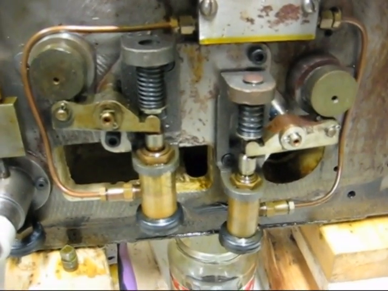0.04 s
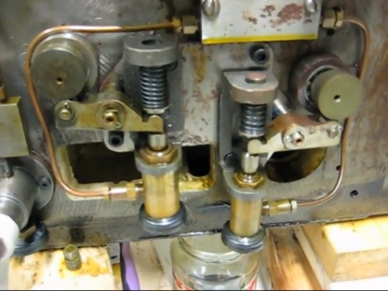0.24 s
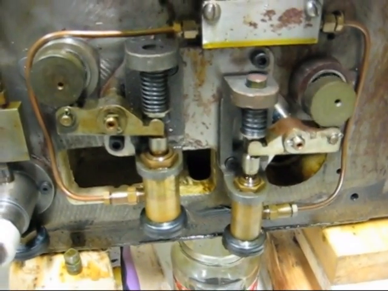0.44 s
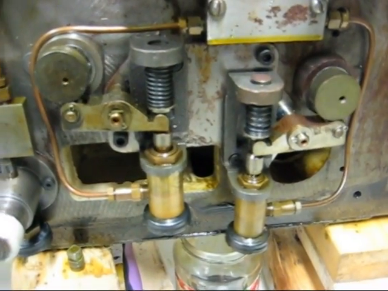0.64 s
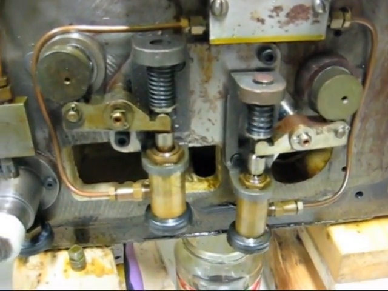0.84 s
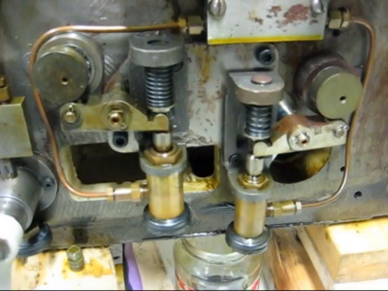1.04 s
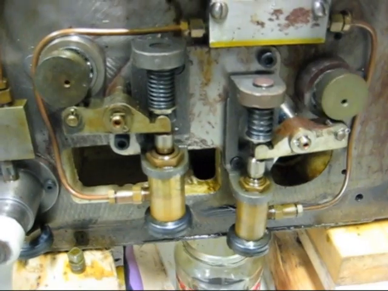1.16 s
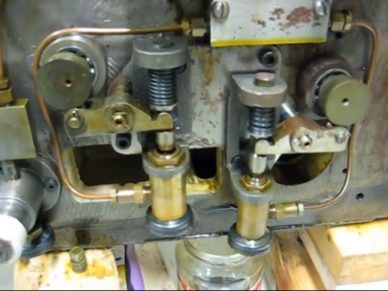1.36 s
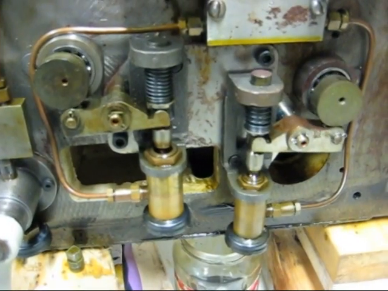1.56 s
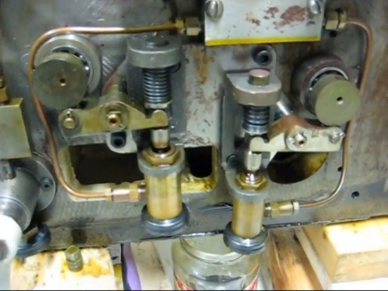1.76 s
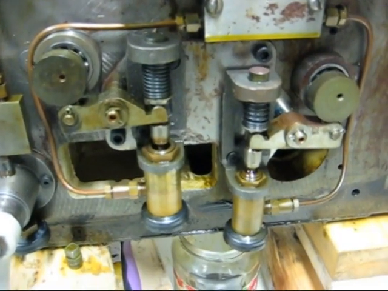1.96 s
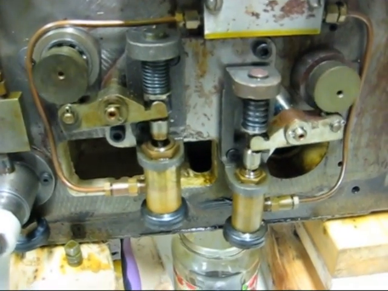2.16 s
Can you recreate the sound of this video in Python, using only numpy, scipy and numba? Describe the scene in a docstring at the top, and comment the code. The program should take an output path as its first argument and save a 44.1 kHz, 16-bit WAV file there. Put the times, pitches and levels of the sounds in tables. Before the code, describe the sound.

Metal pump levers clicking and knocking unevenly, with short rasps of rubbing steel.

```python
"""The cams of a lathe's oil pump, turned by hand in a small workshop, close to a camera's microphone.
Rollers rub on the cams, levers knock against the plungers and springs snap with bright ticks.
The casting and the room ring on, and a long spring sings after two late knocks. Behind it lie still air
and a distant hum. The camera whines, hisses and limits the loudest knocks; only its left channel is live."""
import sys
import numpy as np
from scipy import signal
from scipy.fft import rfft, irfft
from scipy.io import wavfile
from scipy.ndimage import uniform_filter1d
from numba import njit

SR = 44100
rng = np.random.default_rng(int(sys.argv[2]) if len(sys.argv) > 2 else 0)


def transcribe(u):
    """Save the signal u as a 16-bit wav file named by the first command-line argument.

    u: samples, shape (n,) or (channels, n), limited to [-1, 1]; the rate is SR.
    q: integer samples, one column per channel.
    """
    v = np.clip(np.atleast_2d(u).T, -1, 1)
    q = np.round(v * 32767).astype(np.int16)
    wavfile.write(sys.argv[1], SR, q)


N = 97020  # 2.2 s


def undb(db):
    """Decibels to amplitude."""
    return 10 ** (np.asarray(db) / 20)


def level(x, db):
    """Scale to an RMS level in dB."""
    return x * undb(db) / np.sqrt(np.mean(x ** 2))


def unit_energy(x):
    """Scale to an energy of 1."""
    return x / np.sqrt(np.sum(x ** 2))


def fade(t, t60_s):
    """Exponential decay that is 60 dB down at t60_s."""
    return np.exp(-np.log(1000) * t / t60_s)


def tint(x, points):
    """Filter by a curve through (frequency_hz, gain_db) points."""
    hz, db = np.array(points).T
    bins_hz = np.maximum(np.fft.rfftfreq(len(x), 1 / SR), 1)
    return irfft(rfft(x) * undb(np.interp(np.log(bins_hz), np.log(hz), db)), len(x))


def resonate(x, hz, width_hz):
    """Two-pole resonance with gain 1 at its centre."""
    return signal.lfilter(*signal.iirpeak(hz, hz / width_hz, fs=SR), x)


def camera_whine():
    """A thin buzz at the microphone: tones whose phase slips and snaps back with each frame."""
    # whine tones: pitch_hz, slip_hz, relative_db
    tones = [(7560, 10.5, 0), (7852.2, 15, -5.5), (11041, 0, -17)]
    frame_hz, snap_s = 30, .0015
    t = np.arange(N) / SR
    in_frame_s = uniform_filter1d((t + rng.random()) % (1 / frame_hz), int(snap_s * SR))
    whine = sum(undb(db) * np.sin(2 * np.pi * (hz * t + slip_hz * in_frame_s))
                for hz, slip_hz, db in tones)
    return level(whine, db=-39.5)


def air_and_hiss():
    """Still workshop air and steady microphone hiss."""
    # noise floor colour: frequency_hz, gain_db
    colour = [(25, -0.5), (100, 1.5), (220, 1.5), (450, -4), (950, 6.5), (1250, 3.5), (2100, -77.5),
              (2600, -13.5), (4700, -7.5), (5700, 9.5), (7000, -16), (8400, 1.5), (9300, 9.5), (10800, 7.5),
              (12000, -13.5)]
    return level(tint(rng.standard_normal(N), colour), db=-43)


def distant_hum():
    """Faint, unsteady low tones from far off in the workshop."""
    # hum tones: pitch_hz, level_db
    tones = [(199, -66), (385, -62)]
    return sum(level(resonate(rng.standard_normal(N), hz, width_hz=12.6), db) for hz, db in tones)


def rollers():
    """Oily steel rubs on the cams: a smooth rush with tiny catches, following the speed of the hand."""
    # course of the rubbing: time_s, level_db
    course = [(0, -41.5), (.1, -41.5), (.17, -36.5), (.3, -31), (.42, -35), (0.602, -38.5), (.72, -44),
              (.98, -42), (1.12, -41), (1.24, -35.5), (1.42, -36), (1.55, -39), (1.689, -46.5),
              (1.98, -40.5), (2.07, -38), (2.16, -32), (2.2, -36)]
    # colour of the rubbing: frequency_hz, gain_db
    colour = [(60, -31), (200, -7.5), (380, -4.5), (550, -4.5), (750, 1), (1000, 3.5), (1220, -5),
              (1450, -1.5), (2150, 2), (2500, -7), (4200, -7), (7000, -9.5), (11000, -16)]
    catches_per_s, spread_db, catch_share = 2200, 1.5, .5
    catches = (rng.random(N) < catches_per_s / SR) * rng.standard_normal(N)
    catches *= undb(spread_db * np.minimum(rng.exponential(size=N), 4))
    rub = tint(rng.standard_normal(N) + catch_share * level(catches, db=0), colour)
    return level(rub, db=0) * undb(np.interp(np.arange(N) / SR, *np.array(course).T))


def blows(contacts, modes, rattle_t60_s):
    """Each contact sends one push and a short rattle into the damped modes of a part."""
    # bass, mid, upper mid and treble bands: centre_hz
    bands_hz = (740, 1296, 2970, 5400)
    favour_db, favour_octaves, rattle_rise_s = 8, .13, .0013
    out, t = np.zeros(N + SR), np.arange(SR // 8) / SR
    hz, width_hz, mode_db = np.array(modes, float).T
    rattle_shape = fade(t, rattle_t60_s) * (1 - np.exp(-t / rattle_rise_s))
    for start_s, level_db, favoured_hz, *colour_db, rattle_db in contacts:
        force = undb(rattle_db) * unit_energy(rng.standard_normal(len(t)) * rattle_shape)
        force[0] += 1  # the push
        # the point of contact brings out the modes near one frequency
        lift_db = favour_db * np.exp(-.5 * (np.log2(hz / favoured_hz) / favour_octaves) ** 2)
        gains = undb(mode_db + lift_db + np.interp(np.log(hz), np.log(bands_hz), colour_db))
        ring = sum((-1) ** k * gains[k] * resonate(force, hz[k], width_hz[k]) for k in range(len(hz)))
        start = int(start_s * SR)
        # level_db counts the whole blow's energy as if it fell within 10 ms
        out[start:start + len(t)] += unit_energy(ring) * undb(level_db) * np.sqrt(SR / 100)
    return out[:N]


def lever_knocks():
    """Levers strike the plungers close to the microphone and rattle briefly."""
    # knocks: start_s, level_db, favoured_hz, bass_db, mid_db, upper_mid_db, treble_db, rattle_db
    knocks = [(.1632, -30, 1670, -5, -1, -2, -7, -10), (.3250, -27.5, 1930, 0.5, -5, -8, -9, -14),
              (.4215, -14, 2470, 1, 3.5, 3, 8, -5), (.4315, -21, 840, 6, -7, -10, -11, 4),
              (.4506, -0.5, 2597, 9, 4, 8, 21.5, -15), (.4551, -9.5, 2750, -26, -3, 6, 15, -18),
              (.6635, -25, 1760, -3, -10, -1, -21, 1), (.7742, -5, 1460, 0, 3, -2, -17, -5),
              (1.218, -34.5, 2050, 7, -13, 0, 2, 23), (1.412, -34, 770, 7, -9, -11, 8, -24),
              (1.4778, -10.5, 1776, -3, 2, -6.5, -6, -4.5), (1.7285, -35.5, 1190, 9, -3, -7, 6, -3),
              (1.7632, -8.5, 1398, -3, -5, -10.5, -27, -4), (1.7685, -18.5, 1280, 1, 12, 4, -11, -8),
              (2.165, -31, 1930, 4, -4, 1, -9, -4), (2.183, -32, 1940, 6, -6, -10, -2, -4)]
    # damped modes of lever and plunger: pitch_hz, width_hz, gain_db
    modes = [(464, 174, -21.5), (724, 172, -4.5), (820, 104, 0), (1051, 229, 3), (1240, 320, 2),
             (1567, 311, 2.5), (1843, 182, 4), (2020, 163, 3.5), (2274, 130, 3.5), (2740, 260, -3),
             (3700, 410, -15.5), (4150, 300, -16.5), (4646, 290, -15), (5460, 550, -24), (6400, 130, -24),
             (8700, 710, -64)]
    return blows(knocks, modes, rattle_t60_s=.047)


def spring_ticks():
    """Springs snap and ring their seats with bright ticks."""
    # ticks: start_s, level_db, favoured_hz, bass_db, mid_db, upper_mid_db, treble_db, rattle_db
    ticks = [(.2046, -18.5, 3880, 0, -19, 4.5, 0, 2), (.2063, -19.5, 2050, 3, 8.5, -4, -16, -1.5),
             (.3627, -22, 3830, -8, -12, -3.5, 1, -6), (.4413, -31.5, 3940, 0, 16, -24, 6, 16),
             (1.007, -41, 3930, -8, -12, 6, -7, -4), (1.2834, -13.5, 3864, 1, 1, 6.5, 3.5, -7),
             (1.5213, -34.5, 4600, -9, 11, -6, -1, -10), (1.5368, -33.5, 3900, -9, -12, -2, -4, -1),
             (1.543, -35, 5750, -14, -12, -2, -5, 23), (1.6235, -41, 7700, -9, -12, -14, 8, -10),
             (1.7429, -26.5, 3150, -9, -10, -5, 3, -6)]
    # damped modes of the spring seat: pitch_hz, width_hz, gain_db
    modes = [(1526, 210, 1.5), (2000, 450, -0.5), (2050, 93, 6.5), (3170, 660, -3.5), (3610, 620, -1.5),
             (4315, 860, -2), (6170, 1230, -4.5), (8200, 2100, -9), (9660, 400, -12)]
    return blows(ticks, modes, rattle_t60_s=.021)


def casting_ring(hits):
    """The iron housing rings faintly after every blow."""
    # lasting modes of the casting: pitch_hz, relative_db, t60_s
    modes = [(859, -20, 1), (967, 16.5, 1), (1015, 13.5, 0.52), (1133, 12, .7), (1345, 11, 0.93),
             (1460, 5, 1), (1692, -25.5, 0.23), (1784, -26.5, .6), (1994, -18, 0.2), (2285, -5, 0.25),
             (2600, 1, 1), (2476, -11, 0.55), (2574, -11, 0.77), (2740, -3, 0.82)]
    t = np.arange(N) / SR
    ring = sum(undb(db) * np.sin(2 * np.pi * hz * t) * fade(t, t60_s) for hz, db, t60_s in modes)
    return undb(-32) * signal.fftconvolve(hits, unit_energy(ring))[:N]


def workshop_echo(hits):
    """Diffuse echo of the small room; the high treble dies first."""
    # echo bands: centre_hz, relative_db, t60_s
    bands = [(200, 5, 0.23), (570, 5.5, 0.41), (1290, -4.5, 1), (2220, -1.5, .65), (4250, -0.5, 0.63),
             (9900, -3, 0.13)]
    build_s = .0046
    t, echo = np.arange(N) / SR, np.zeros(N)
    log_hz = np.log(np.maximum(np.fft.rfftfreq(N, 1 / SR), 1))
    log_centres = np.log([band[0] for band in bands])
    spectrum = rfft(rng.standard_normal(N))
    for (_, db, t60_s), share in zip(bands, np.eye(len(bands))):
        band_noise = irfft(spectrum * np.interp(log_hz, log_centres, share), N)
        echo += undb(db) * fade(t, t60_s) * band_noise
    echo *= 1 - np.exp(-t / build_s)
    return undb(-16) * signal.fftconvolve(hits, unit_energy(echo))[:N]


def long_spring():
    """The long pump spring sings a wavering, slowly fading tone; two late knocks each start it afresh."""
    # swings of the spring: start_s, level_db
    swings = [(1.478, -44), (1.764, -39.5)]
    pitch_hz, rise_s, t60_s = 501, .025, 1.8
    t, swing = np.arange(N) / SR, np.zeros(N)
    for start_s, db in swings:
        age = np.maximum(t - start_s, 0)
        swing = np.maximum(swing, undb(db) * fade(age, t60_s) * (1 - np.exp(-age / rise_s)))
    waver = level(resonate(rng.standard_normal(N), pitch_hz, width_hz=23), db=-12)
    return swing * (np.sin(2 * np.pi * pitch_hz * t) + waver)


@njit
def limiter_cut_db(over_db):
    """The camera's gain reduction: it grabs quickly and lets go at a steady rate."""
    attack_s, release_db_per_s = .00034, 149
    attack = 1 - np.exp(-1 / (attack_s * SR))
    out, cut = np.zeros(len(over_db)), 0.
    for i in range(len(over_db)):
        if over_db[i] > cut:
            cut += attack * (over_db[i] - cut)
        else:
            cut = max(cut - release_db_per_s / SR, 0.)
        out[i] = cut
    return out


def scene():
    """The pump close up with the workshop behind it, on the left channel alone."""
    hits = lever_knocks() + spring_ticks()
    pump = hits + casting_ring(hits) + workshop_echo(hits) + long_spring() + rollers()
    left = pump + camera_whine() + air_and_hiss() + distant_hum()
    return np.array([left, np.zeros(N)])


def record(dry):
    """The camera ducks after loud knocks; what overshoots saturates, and a hard overload thumps."""
    limit_above, saturate_at, thump_above = .63, .88, 3.2  # amplitudes, full scale = 1
    knee, thump_hz, thump_db, top_hz = 5, 300, -28, 12100
    left, right = dry
    over_db = 20 * np.log10(np.abs(left) / limit_above + 1e-9)
    limited = left * undb(-limiter_cut_db(over_db))
    saturated = limited / (1 + np.abs(limited / saturate_at) ** knee) ** (1 / knee)
    overload = np.maximum(np.abs(left) - thump_above, 0)
    thump = undb(thump_db) * signal.sosfilt(signal.butter(1, thump_hz, fs=SR, output="sos"), overload)
    left = np.convolve(saturated - thump, signal.firwin(101, top_hz, fs=SR), "same")
    return np.array([left, right])


dry = scene()
out = record(dry)
transcribe(out)
```